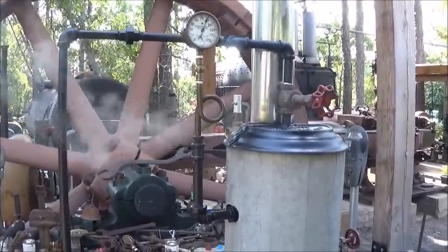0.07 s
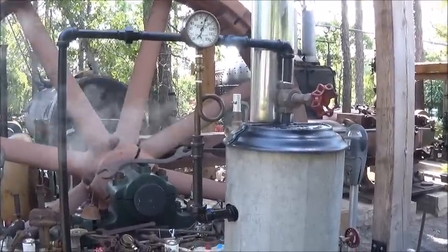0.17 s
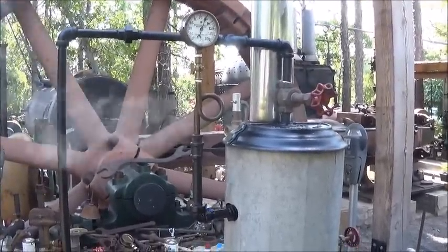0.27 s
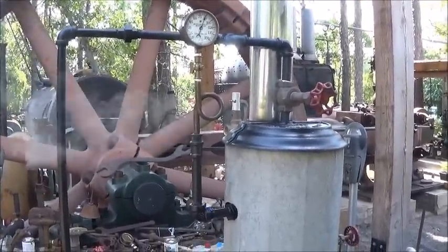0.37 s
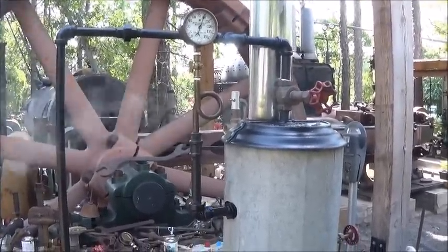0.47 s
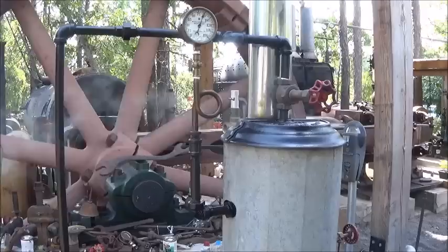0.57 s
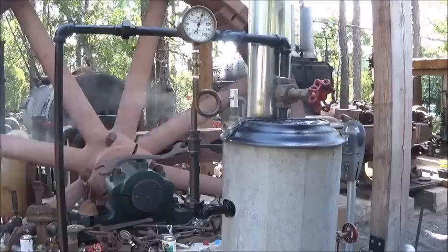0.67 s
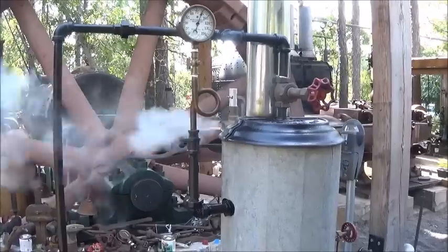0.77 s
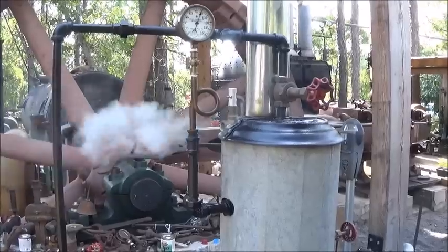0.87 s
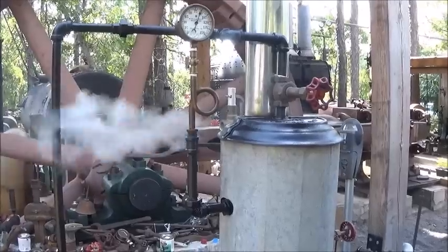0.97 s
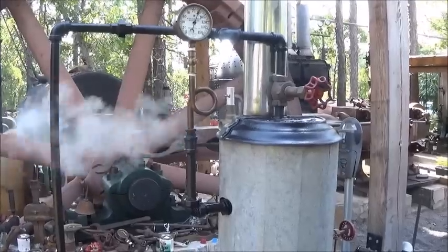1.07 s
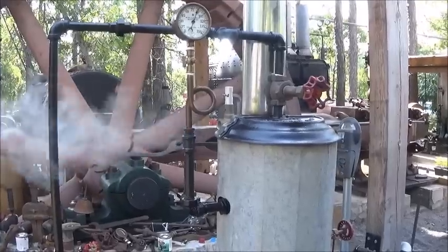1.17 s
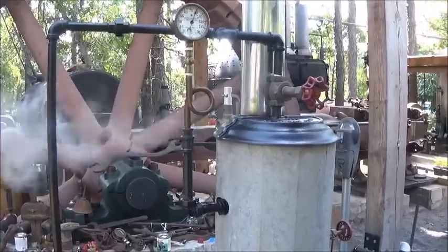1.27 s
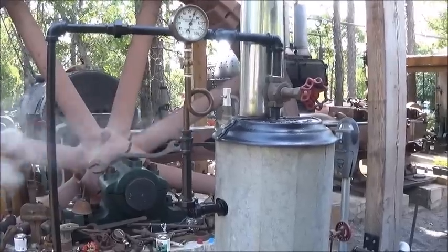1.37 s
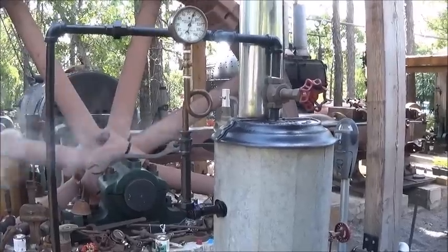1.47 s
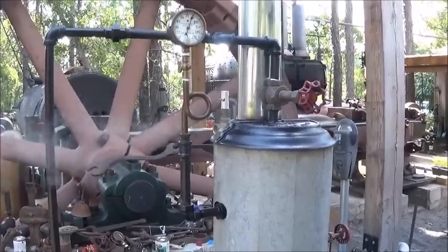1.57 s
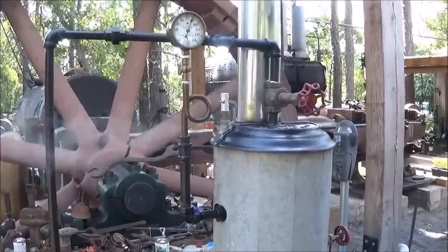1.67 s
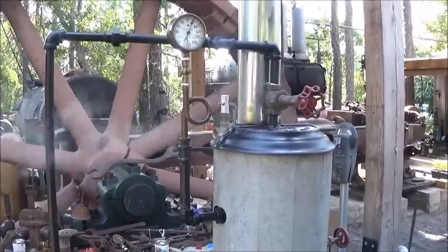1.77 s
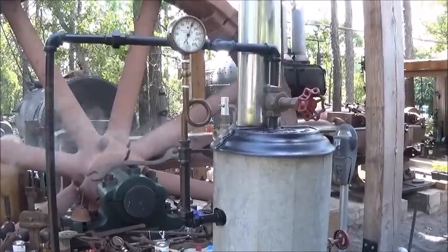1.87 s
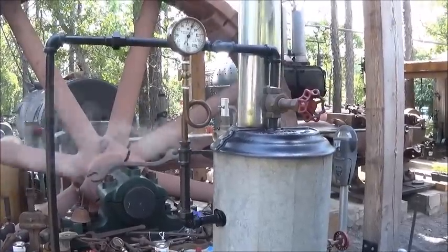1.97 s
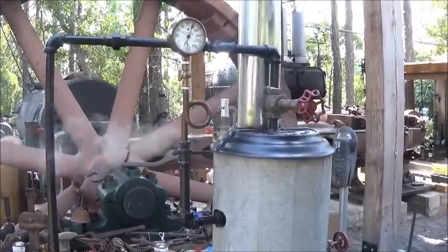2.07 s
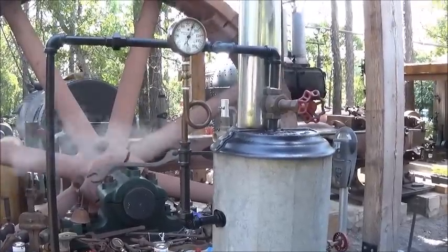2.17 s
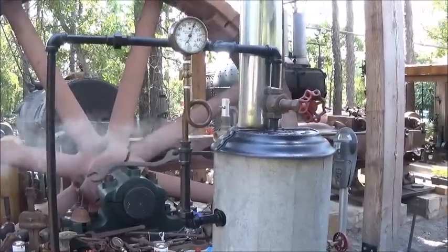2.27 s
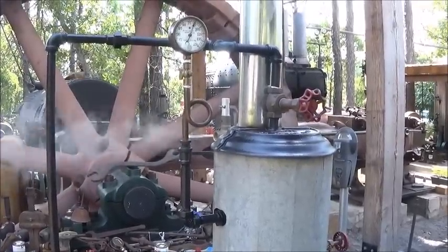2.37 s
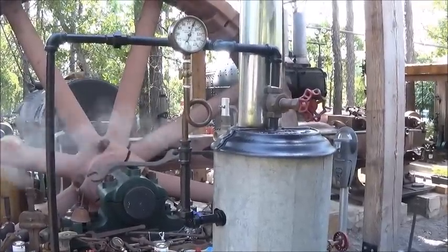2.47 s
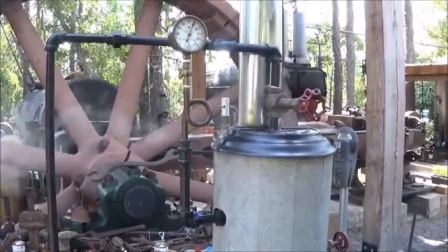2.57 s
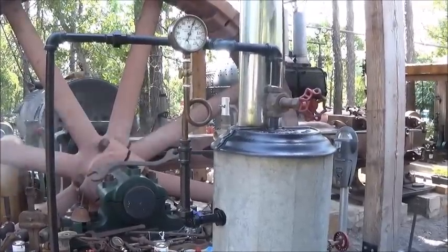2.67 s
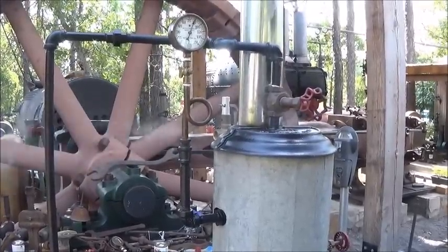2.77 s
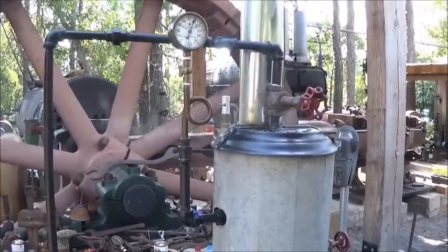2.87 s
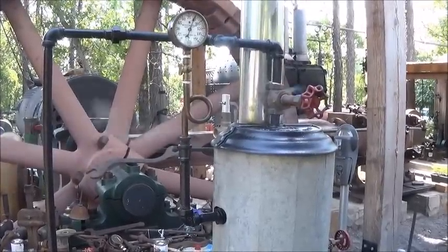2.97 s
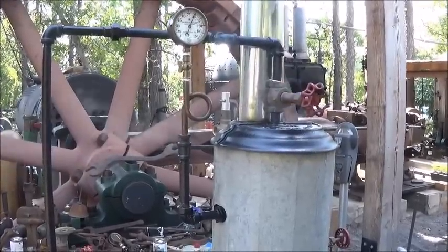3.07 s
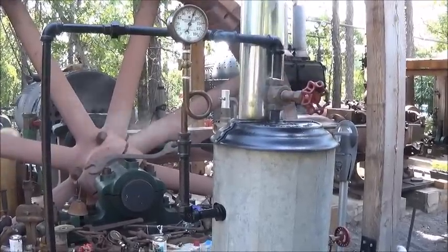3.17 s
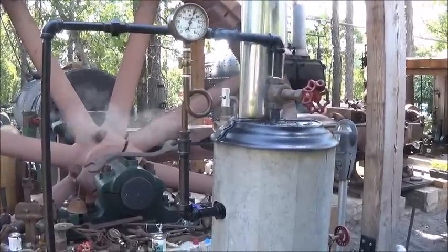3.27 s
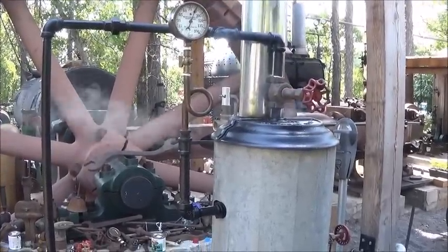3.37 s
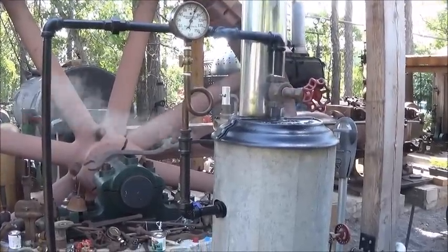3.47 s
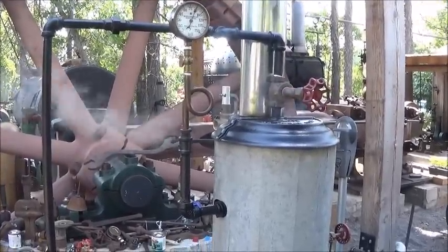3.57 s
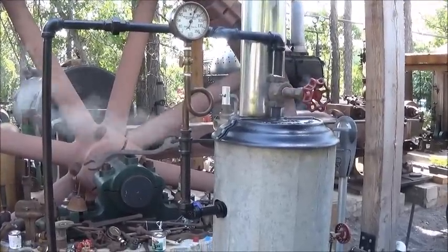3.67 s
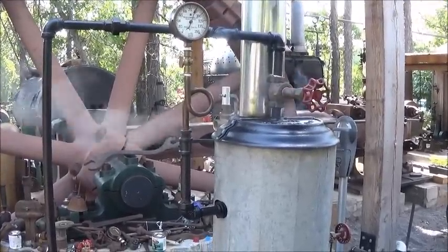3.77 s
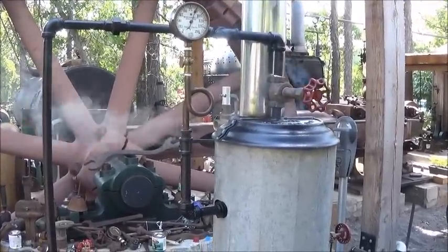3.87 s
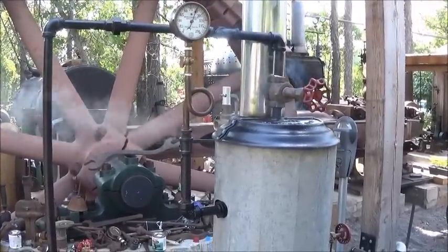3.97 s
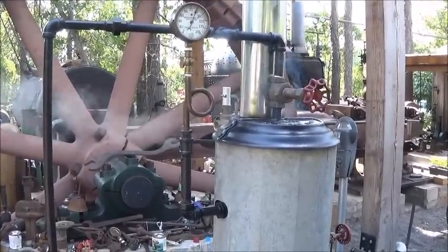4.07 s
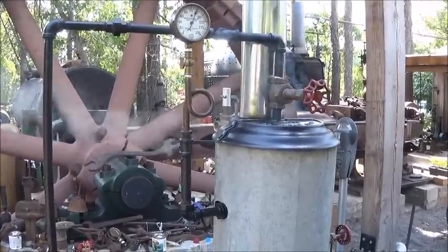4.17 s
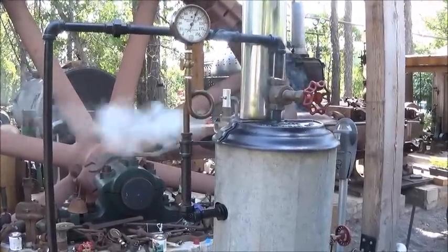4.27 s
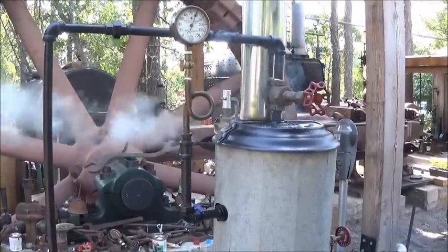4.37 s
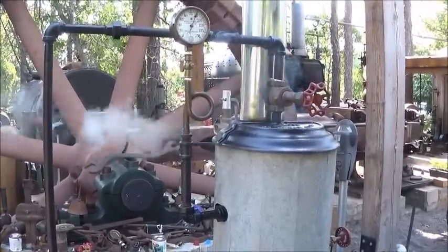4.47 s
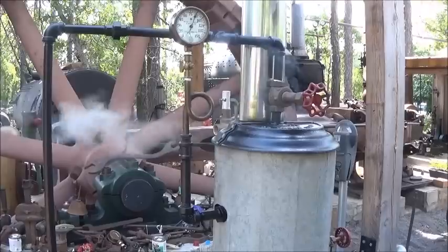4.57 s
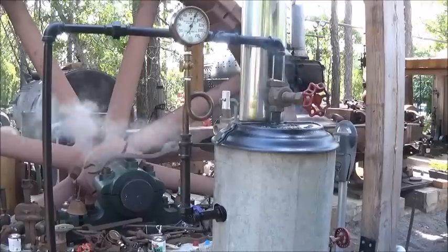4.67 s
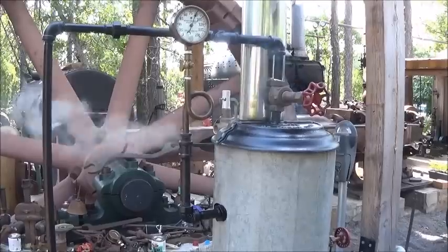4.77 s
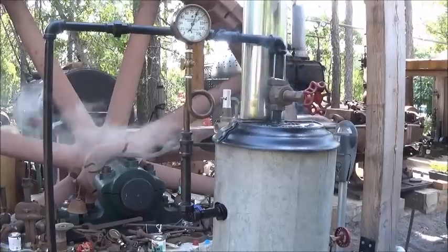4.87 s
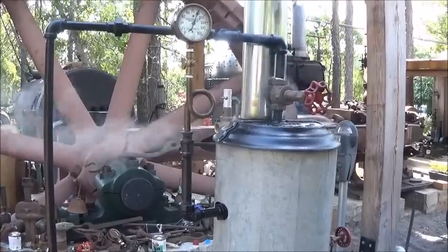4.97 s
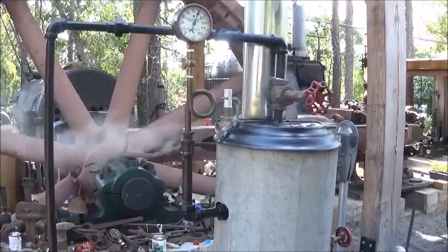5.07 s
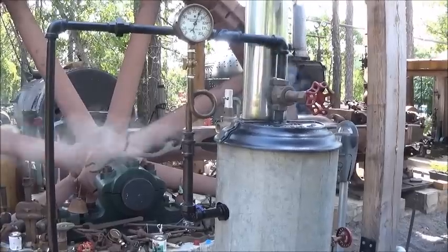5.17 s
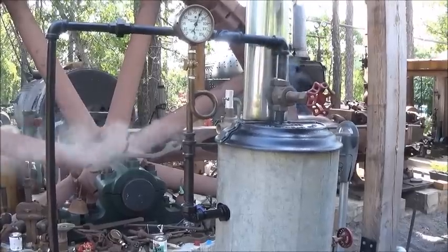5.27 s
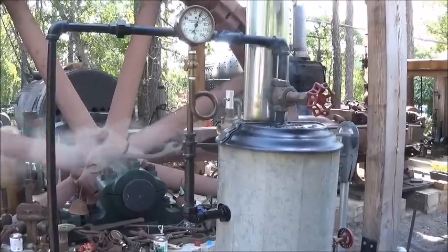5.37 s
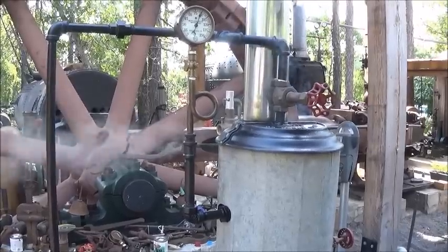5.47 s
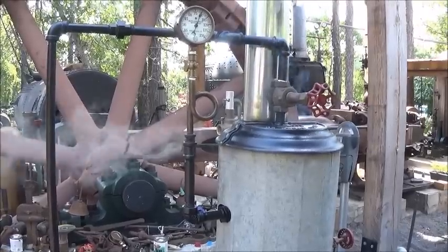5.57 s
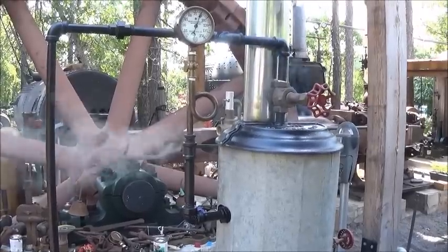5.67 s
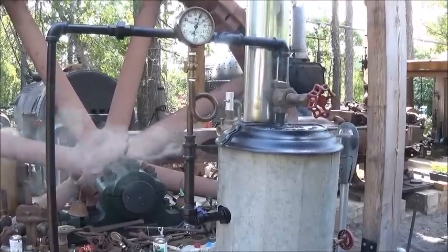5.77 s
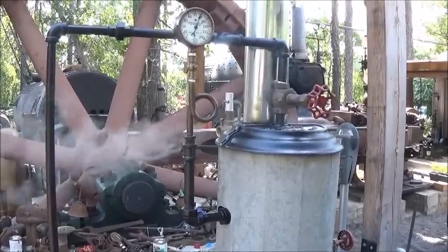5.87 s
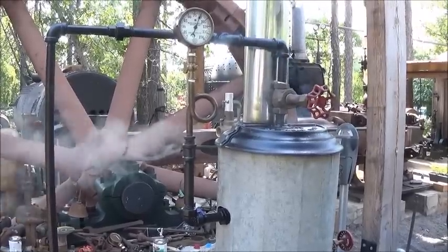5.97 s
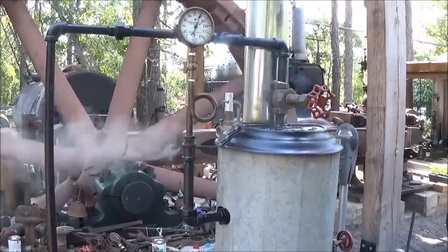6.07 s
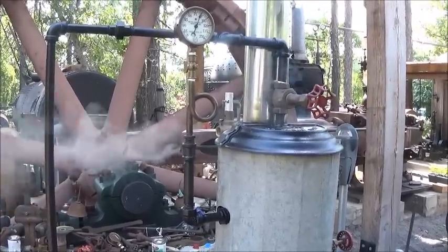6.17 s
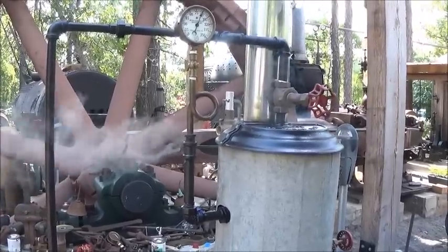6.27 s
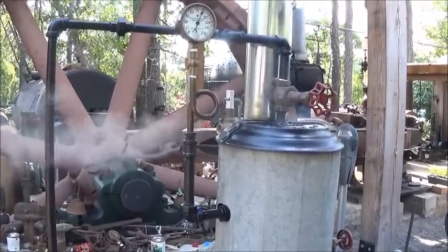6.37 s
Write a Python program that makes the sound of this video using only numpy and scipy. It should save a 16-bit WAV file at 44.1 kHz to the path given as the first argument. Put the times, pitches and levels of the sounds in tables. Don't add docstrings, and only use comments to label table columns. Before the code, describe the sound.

Continuous harsh steam hiss in an open shed, faint low fire rumble beneath, interrupted by brief metallic clacks, pipe thumps and wet spurts.

```python
import sys
import numpy as np
from scipy import signal
from scipy.fft import rfft, irfft
from scipy.io import wavfile
from scipy.ndimage import uniform_filter1d

SR = 44100
rng = np.random.default_rng(int(sys.argv[2]) if len(sys.argv) > 2 else 0)


def magnitude_from_level(level_db):
    exponent = np.asarray(level_db, float) / 20
    return 10 ** exponent


def materialize(psi):
    bounded = np.clip(np.atleast_2d(psi).T, -1, 1)
    quanta = np.round(bounded * 32767).astype(np.int16)
    wavfile.write(sys.argv[1], SR, quanta)


N = 283122


def evened(x):
    return x / np.sqrt(np.mean(np.abs(x) ** 2) + 1e-20)


def read(points, hz):
    f, value = np.transpose(points)
    return np.interp(np.log(hz + 1), np.log(f + 1), value)


def hump(hz, centre_hz, width_hz):
    return 1 / (1 + 2j * (hz - centre_hz) / width_hz)


def flow(table, t):
    return np.interp(t, *np.transpose(table))


def bumps(rows, t):
    return sum(db * np.exp(-((t - s) / length) ** 2) for s, length, db in rows)


def add(mix, s, sound):
    part = mix[round(s * SR):][:len(sound)]
    part += sound[:len(part)]


def turbulence(shape, level_db, band, patchy_db, flicker_db, size=512):
    hop = size // 4
    frames, hz = N // hop + 5, np.fft.rfftfreq(size, 1 / SR)
    a, b, patches = rng.standard_normal((frames, len(hz), 3)).T
    patches = uniform_filter1d(patches, size=8, axis=0)
    patches = evened(uniform_filter1d(patches, size=40, axis=1))
    gusts = uniform_filter1d(rng.standard_normal(frames), size=6)
    gusts = evened(uniform_filter1d(gusts, size=4))
    gain = shape(hz)[:, None] * magnitude_from_level(patchy_db * patches + flicker_db * gusts)
    noise = signal.istft((a + 1j * b) * gain, nperseg=size, noverlap=size - hop)[1][:N]
    inside = (hz > band[0]) & (hz < band[1])
    power = shape(hz) ** 2
    share = np.sum(power[inside]) / np.sum(power)
    return evened(noise) * magnitude_from_level(level_db) / np.sqrt(share)


def steam_db(level_db, lift_share, dry_share, cloud_share):
    # t/s, seat hiss/dB
    lift = [(0.0, -22), (0.02, -21.5), (0.68, -23.5), (0.84, -26.5), (0.88, -23), (2.32, -22.5),
            (2.34, -23), (4.02, -24), (4.15, -22.5), (4.36, -23.5), (4.67, -22.5), (4.81, -27),
            (4.9, -21.5), (5.88, -21.5), (6.04, -26.5), (6.24, -21.5), (6.28, -24.5), (6.42, -23)]
    # t/s, level/dB
    dryness = [(0, -1), (.1, -2.5), (.5, -4.5), (.82, -3.5), (.86, -3), (1.05, -4), (1.15, 0), (1.55, 0),
               (1.75, 2), (2.5, 1.6), (3.04, 0.2), (3.2, 0.9), (3.6, 2.5), (3.95, 2.5), (4.3, 1.5),
               (5.0, 1.2), (5.7, 1.5), (6.42, 3.5)]
    # t/s, half length/s, depth/dB
    clouds = [(0.202, 0.048, -6.1), (0.367, 0.031, -3.8), (0.815, 0.026, -6.0), (1.045, 0.03, -4.5),
              (1.288, 0.028, -2.0), (1.618, 0.048, -3.1), (1.948, 0.038, -3.3), (2.06, 0.06, -5.0),
              (2.172, 0.023, -6.0), (2.381, 0.02, -4.2), (2.736, 0.092, -2.5), (2.916, 0.045, -6.8),
              (3.312, 0.015, -2.2), (3.87, 0.034, -2.2), (4.121, 0.02, -3.6), (4.207, 0.022, -2.5),
              (4.323, 0.019, -7.6), (4.476, 0.082, -2.5), (4.666, 0.042, -8.1), (4.982, 0.063, -3.4),
              (5.115, 0.066, -5.8), (5.401, 0.024, -4.3), (5.515, 0.046, -7.2), (5.632, 0.03, -2.7),
              (5.892, 0.069, -4.1), (6.212, 0.04, -3.3), (6.41, 0.021, -6.1)]
    lift_mean_db = -22.5
    t = np.arange(0, N + 64, 64) / SR
    level = level_db + lift_share * (flow(lift, t) - lift_mean_db)
    level = level + dry_share * flow(dryness, t) + cloud_share * bumps(clouds, t)
    return np.interp(np.arange(N) / SR, t, level)


def valve():
    # f/Hz, width/Hz, level/dB
    outlet = [(1650, 65, -10.5), (1810, 120, -7.5), (2000, 140, -19), (2400, 2140, -14), (3740, 440, -9.5),
              (4625, 780, -5.5), (5000, 590, -6.5), (7640, 510, -5), (8204, 1000, 0.5), (8790, 970, -6)]
    # f/Hz, level/dB
    roar = [(200, -22.5), (600, -25.5), (850, -21.5), (1030, -20), (1250, -29), (1500, -12), (3500, -12.5),
            (6600, -13), (9000, -8), (10500, -14.5), (16000, -36)]

    def part(level_db, band, lo_hz, hi_hz, flicker_db):
        def shape(hz):
            humps = sum(magnitude_from_level(2 * db) * abs(hump(hz, f, w)) ** 4 for f, w, db in outlet)
            share = 1 / (1 + (lo_hz / (hz + 1)) ** 24) / (1 + (hz / hi_hz) ** 24)
            return np.sqrt((humps + magnitude_from_level(2 * read(roar, hz))) * share)
        return turbulence(shape, level_db, band, patchy_db=0.7, flicker_db=flicker_db)

    seat = part(steam_db(-22, 1.03, -0.05, 0.07), (7000, 9300), 7150, 30000, 0.83)
    body = part(steam_db(-26, 0.18, 0.2, -0.01), (3900, 6700), 3910, 6730, 0.9)
    pipe = part(steam_db(-30.5, -0.37, 0.47, -0.21), (1400, 3700), 30, 3520, 0.69)
    return seat + body + pipe


def jet():
    # f/Hz, level/dB
    fizz_curve = [(5000, -40.5), (9000, -17), (9700, -3), (10150, 0), (11000, 0), (11900, -1.5),
                  (12500, -3), (13200, -19), (16500, -30)]
    # f/Hz, level/dB
    hump_curve = [(10500, -31), (12300, -16), (12900, -2.5), (13400, -1.2), (13700, -.4), (14100, -1.2),
                  (14600, -11), (16500, -30)]
    # f/Hz, level/dB
    top_curve = [(11000, -29.5), (13500, -5), (14300, 1), (15100, 3), (15700, -7), (16500, -4)]

    def part(curve, level_db, band, patchy_db, flicker_db):
        return turbulence(lambda hz: magnitude_from_level(read(curve, hz)), level_db, band, patchy_db, flicker_db)

    fizz = part(fizz_curve, steam_db(-26, 0.2, 1, 0.5), (9600, 12200), patchy_db=1.24, flicker_db=1.23)
    whistle = part(hump_curve, steam_db(-30.5, -0.1, 1.3, 1.3), (13000, 14300), patchy_db=2.5, flicker_db=1.9)
    top = part(top_curve, steam_db(-35.5, -0.3, 2.3, 0.8), (14500, 15700), patchy_db=1.5, flicker_db=0.7)
    return fizz + whistle + top


def plume(x):
    # t/s, half length/s, level/dB, f/Hz, half width/Hz
    eddies = [(.35, 0.67, 5.5, 5600, 900), (0.725, .03, -2, 4800, 1200), (0.873, 0.077, -4, 4800, 1500),
              (1.1, .045, -2, 10800, 1200), (2.12, 0.098, 2.5, 4600, 900), (2.385, .035, 3.5, 4670, 900),
              (2.473, 0.099, -2, 4700, 900), (2.5, 0.1, 2, 10500, 900), (2.9, .1, 1, 12200, 500),
              (3.1, .15, -3, 10200, 500), (3.33, .03, -6, 11000, 1100), (3.4, .2, -5, 6470, 450),
              (3.75, .12, -14, 12000, 350), (3.9, .09, -4, 12850, 260), (4.19, .17, -5, 12600, 300),
              (4.153, .08, -4, 9500, 300), (4.188, .04, -7, 11300, 900), (4.356, 0.028, -6, 8000, 1300),
              (4.6, 0.18, -6, 8700, 280), (4.85, 0.12, 3.5, 10700, 900), (5.13, 0.056, -3, 11000, 1100),
              (5.5, 0.07, 6, 9600, 600), (5.718, .05, 1.5, 11500, 1200), (6.15, .3, 1, 1000, 400)]
    hz, t, z = signal.stft(x, SR, nperseg=256)
    shade_db = 0
    for s, length, db, f, width in eddies:
        distance = ((t - s) / length) ** 2 + ((hz[:, None] - f) / width) ** 2
        shade_db = shade_db + db * np.exp(-distance)
    return signal.istft(z * magnitude_from_level(shade_db), SR, nperseg=256)[1][:N]


def shed(x, echo_size=1.09, tail_db=-13, t60=0.13):
    # delay/ms, gain
    echoes = [(1.772, 0.04), (1.932, -0.1), (2.082, -0.04), (3.474, 0.04), (4.212, -0.05), (4.938, 0.04),
              (5.146, -0.04), (5.282, -0.05), (5.938, 0.05), (6.682, 0.04), (6.91, 0.05), (7.174, 0.05),
              (7.406, 0.05), (7.504, -0.06), (7.548, -0.03), (7.778, 0.06), (7.876, 0.07), (8.21, -0.05),
              (9.408, -0.05), (9.616, 0.04), (11.134, 0.05), (12.352, 0.04), (13.26, 0.04), (13.59, -0.04)]
    hz, t = np.fft.rfftfreq(N, 1 / SR), np.arange(SR // 10) / SR
    early = 1 + echo_size * sum(g * np.exp(-2j * np.pi * hz * ms / 1e3) for ms, g in echoes)
    signs = rng.choice([-1., 1.], len(t))
    sparse = rng.random(len(t)) < 0.05
    taps = signs * sparse * (t > 0.003) * magnitude_from_level(-60 * t / t60)
    path = early + magnitude_from_level(tail_db) * rfft(taps / np.linalg.norm(taps), N)
    return irfft(rfft(x) * path / np.sqrt(np.mean(abs(path) ** 2)), N)


def fire():
    # f/Hz, level/dB
    bed = [(25, -24), (80, -11), (130, -9), (190, -4), (260, -4.5), (330, -5.5), (500, -8.5), (1000, -24)]
    # t/s, rumble/dB
    draught_curve = [(0, -45), (.43, -41.5), (.8, -39), (1.52, -39.5), (1.75, -38.5), (2.18, -46),
                     (2.48, -45.5), (2.6, -38.5), (2.75, -44), (3.0, -43), (3.29, -43), (3.6, -39.5),
                     (3.84, -35), (3.98, -41), (4.33, -45), (5.18, -50.5), (5.92, -59), (6.42, -44)]
    # f/Hz, width/Hz, level/dB
    drone = [(60.8, 16, 2), (106.3, 13.5, 0.5), (42.7, 8.5, -8)]
    # t/s, level/dB
    swells = [(.45, 7), (1.11, 6), (1.66, 1), (2.2, 12), (2.73, 7), (3.07, -7), (3.58, 1), (4.33, 3),
              (4.65, 3), (4.95, 5), (5.5, -1), (6.42, 8)]
    t, hz = np.arange(N) / SR, np.fft.rfftfreq(N, 1 / SR)
    draught = flow(draught_curve, t) + 44
    rumble = turbulence(lambda hz: magnitude_from_level(read(bed, hz)), -47 + 0.5 * draught, (140, 340),
                        patchy_db=1.9, flicker_db=0.9, size=2048)
    flare = turbulence(lambda hz: abs(hump(hz, 190, 108)) ** 2, -46.5 + 1.4 * draught, (140, 340),
                       patchy_db=1.4, flicker_db=1.2, size=2048)
    air = rfft(rng.standard_normal(N))
    swell_db = bumps([(s, 0.12, db) for s, db in swells], t)
    tones = 0
    for (f, width, db), share in zip(drone, (0.79, 0.2, 0.6)):
        tone = evened(irfft(air * hump(hz, f, width) ** 2, N))
        tones = tones + magnitude_from_level(db + share * swell_db) * tone
    return rumble + flare + tones * magnitude_from_level(-51.5)


def knocks():
    # t/s, peak/dB, ring f/Hz, t60/s
    strikes = [(0.6995, -9.5, 1900, 0.012), (.707, -18, 1500, 0.01), (.7572, -9, 2000, 0.0076),
               (.763, -20, 1400, .012), (.795, -27, 1010, 0.11), (.805, -29, 656, 0.16),
               (.82, -27, 1273, .17), (0.947, -11, 1650, .01), (.9495, -20, 1670, 0.033),
               (.952, -27, 1160, .03), (0.9918, -7.5, 1700, 0.007), (0.998, -18, 1500, .02),
               (4.3065, -6.5, 1720, .011), (4.31, -11, 2000, .01), (4.3135, -8, 1680, 0.0075),
               (4.317, -17, 1310, 0.019), (4.322, -10, 2400, .012), (4.329, -27, 986, 0.13),
               (4.335, -31, 664, 0.15), (4.34, -32, 443, 0.23), (4.354, -14, 1800, .01)]
    out, t = np.zeros(N), np.arange(SR // 5) / SR
    tick = magnitude_from_level(-1.5 - 60 * t / 0.002) * np.sin(2 * np.pi * 3800 * t)
    for s, db, hz, t60 in strikes:
        onset = np.minimum(1.5 * hz * t, 1)
        ring = magnitude_from_level(-60 * t / t60) * np.sin(2 * np.pi * hz * t) * onset
        add(out, s, magnitude_from_level(db) * (tick + ring))
    return out


def puffs():
    # t/s, length/s, rms level/dB, centre f/Hz, width/Hz
    bursts = [
        (0.758, 0.016, -27, 2000, 2000),
        (.768, 0.019, -14.5, 4200, 3800),
        (0.779, 0.064, -22.5, 3600, 4500),
        (0.796, .045, -30, 900, 1300),
        (0.952, .008, -22, 3200, 4000),
        (0.966, 0.026, -25, 12000, 5000),
        (0.997, 0.035, -37, 1200, 1300),
        (4.307, 0.08, -26.5, 700, 1600),
        (4.306, 0.023, -23, 2400, 3200),
        (4.349, 0.015, -15, 11500, 6000),
    ]
    out, t = np.zeros(N), np.arange(SR // 5) / SR
    drops = rng.standard_normal((len(bursts), len(t), 2))
    clumps = magnitude_from_level(2.8 * evened(uniform_filter1d(drops[..., 1], size=90)))
    spray, f = rfft(drops[..., 0] * clumps), np.fft.rfftfreq(len(t), 1 / SR)
    for (s, length, db, hz, width), z in zip(bursts, spray):
        u = np.clip(t / length, 0, 1)
        swell = np.minimum(u / 0.17, 1) * (1 - u ** 2)
        add(out, s, magnitude_from_level(db) * swell * evened(irfft(z * hump(f, hz, width), len(t))))
    return out


def slugs():
    return knocks() + puffs()


def pops():
    # t/s, peak/dB, f/Hz, t60/s
    thumps = [
        (0.778, -17, 144, 0.054),
        (.813, -29, 190, .05),
        (.85, -30, 150, 0.1),
        (0.949, -21, 161, .07),
        (0.989, -33, 161, 0.062),
        (4.323, -21, 126, 0.13),
        (4.332, -18, 200, 0.018),
        (4.352, -23, 280, 0.043),
    ]
    out, t = np.zeros(N), np.arange(SR // 5) / SR
    for s, db, hz, t60 in thumps:
        onset = np.minimum(4 * hz * t, 1)
        add(out, s, magnitude_from_level(db - 60 * t / t60) * np.sin(2 * np.pi * hz * t) * onset)
    return out


def ports_pair(mid, bursts):
    # f/Hz, width/Hz, size, lag/rad
    ports = [(1900, 540, 0.47, 0.75), (8700, 1800, 0.12, .2)]
    # f/Hz, level/dB
    diffuse = [(30, -48), (90, -43), (200, -27), (500, -25), (1000, -14.5), (1800, -14), (2500, -18.5),
               (3800, -14.5), (6300, -28), (8500, -20.5), (10000, -22.5), (12000, -35), (16000, -45)]
    hz = np.fft.rfftfreq(N, 1 / SR)
    tip = sum(g * np.exp(-1j * lag) * hump(hz, f, w) ** 2 for f, w, g, lag in ports)
    f, t, z = signal.stft(mid, SR, nperseg=512)
    swirl = rng.random((len(t), len(f) + 1)).T
    gusts = magnitude_from_level(1.2 * evened(uniform_filter1d(swirl[0] - 0.5, size=8)))
    patches = uniform_filter1d(rng.standard_normal((len(t), len(f))), size=5, axis=0)
    patches = uniform_filter1d(patches, size=9, axis=1)
    gusts = gusts * magnitude_from_level(4.6 * evened(patches).T)
    loose = z * np.exp(2j * np.pi * swirl[1:]) * magnitude_from_level(read(diffuse, f))[:, None] * gusts
    side = irfft(rfft(mid) * tip, N) + 1.17 * signal.istft(loose, SR, nperseg=512)[1][:N]
    side = side + magnitude_from_level(-16.5) * (np.roll(bursts, 60) - np.roll(bursts, 210))
    return np.array([mid + side, mid - side])


def scene():
    steam = plume(shed(valve()) + shed(jet(), echo_size=0.17, tail_db=-20))
    mid = steam + fire()
    bursts = slugs()
    mid = mid + 0.66 * bursts + 0.4 * shed(bursts, echo_size=0.5, tail_db=5) + pops()
    return ports_pair(mid, bursts)


def band_limit(x):
    return signal.sosfilt(signal.butter(12, 16600, fs=SR, output="sos"), x)


def record(dry):
    limited = np.tanh(dry / 1.208) * 1.183
    edge_hz = 15760
    edge = signal.firwin(4095, edge_hz, window=("kaiser", 7), fs=SR)
    mix = signal.oaconvolve(limited, edge[None], "same")
    return band_limit(mix)


dry = scene()
out = record(dry)
materialize(out)
```